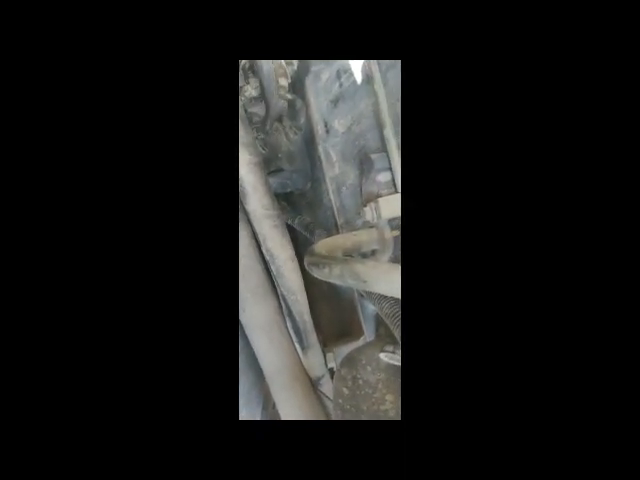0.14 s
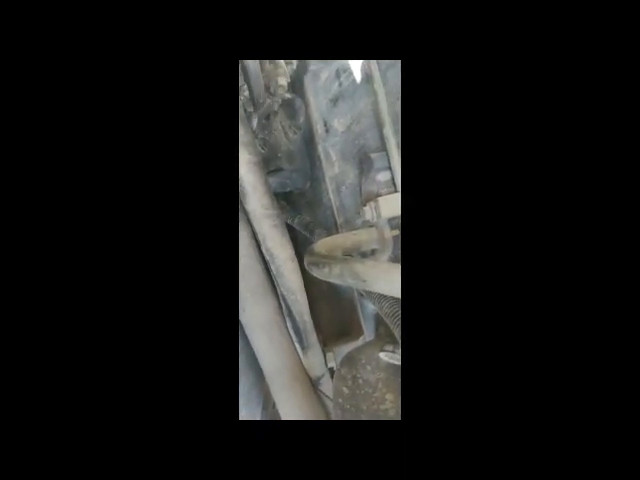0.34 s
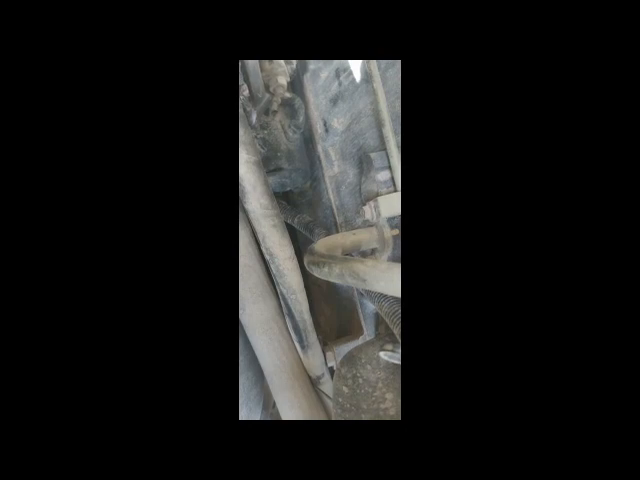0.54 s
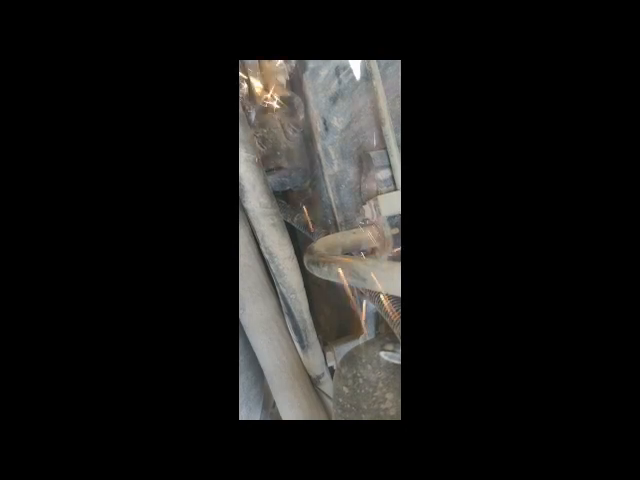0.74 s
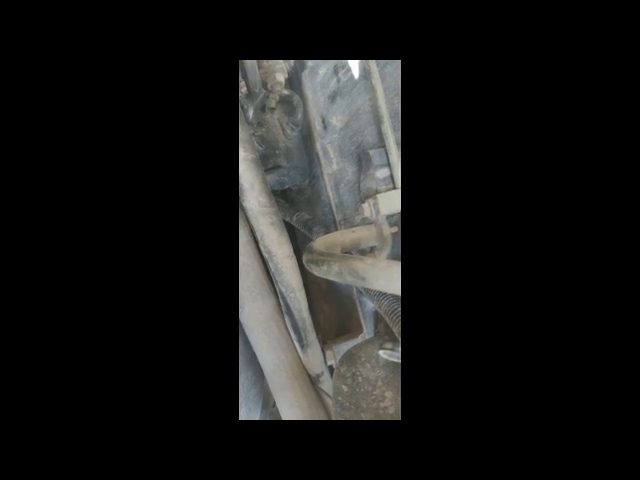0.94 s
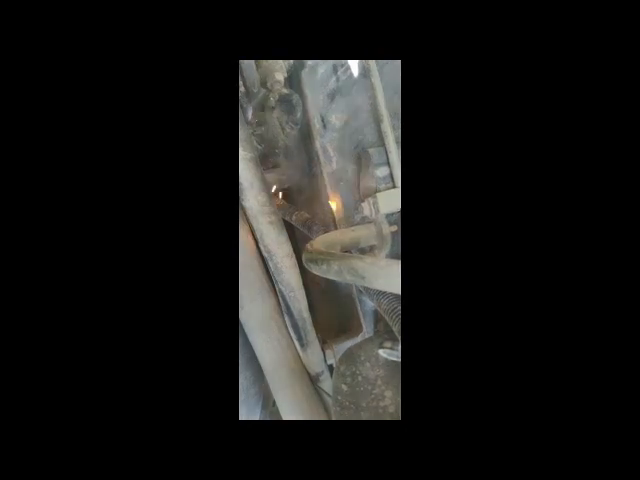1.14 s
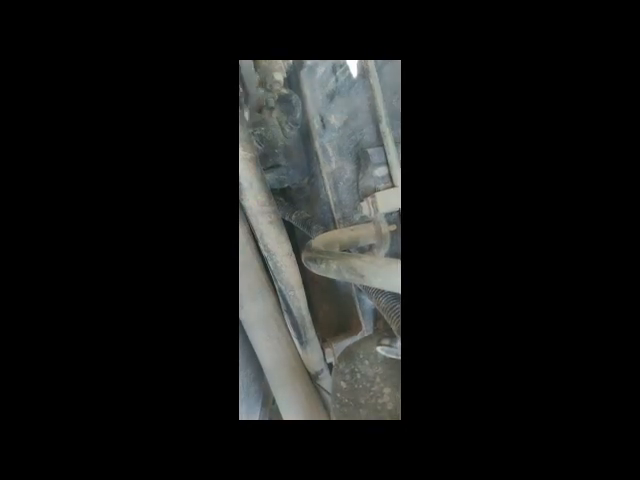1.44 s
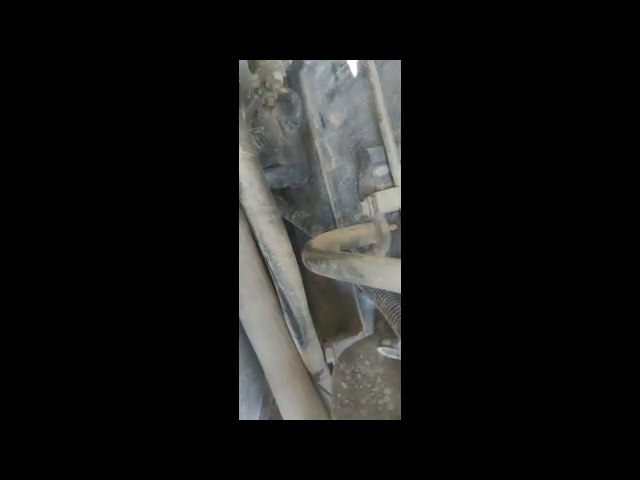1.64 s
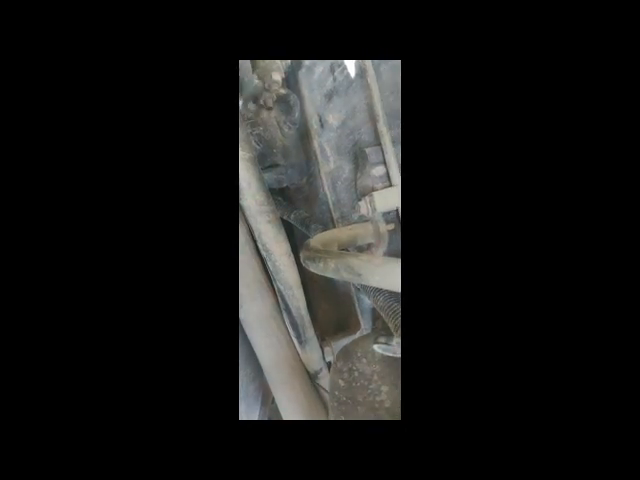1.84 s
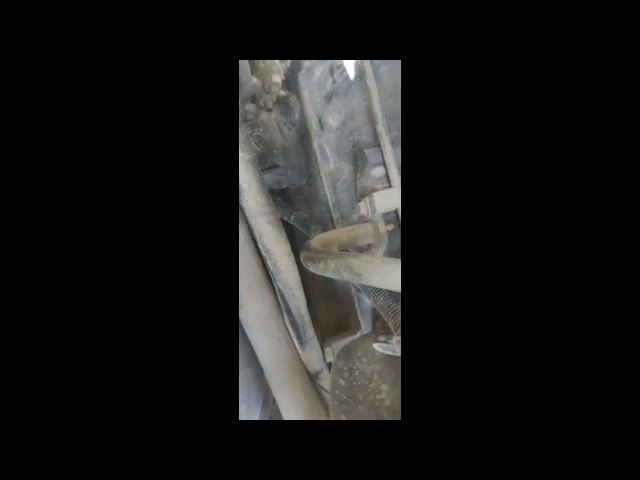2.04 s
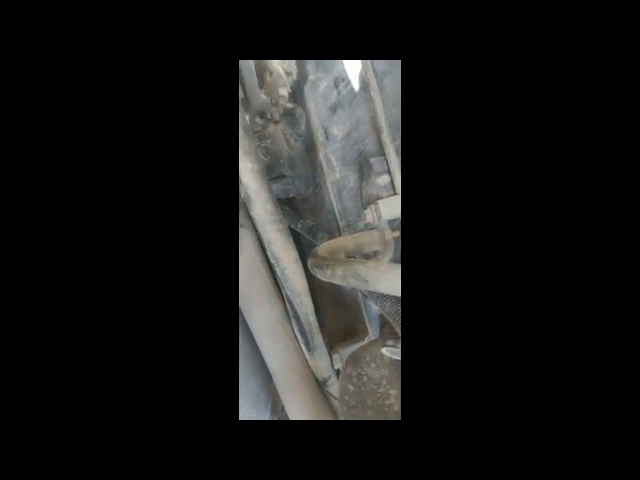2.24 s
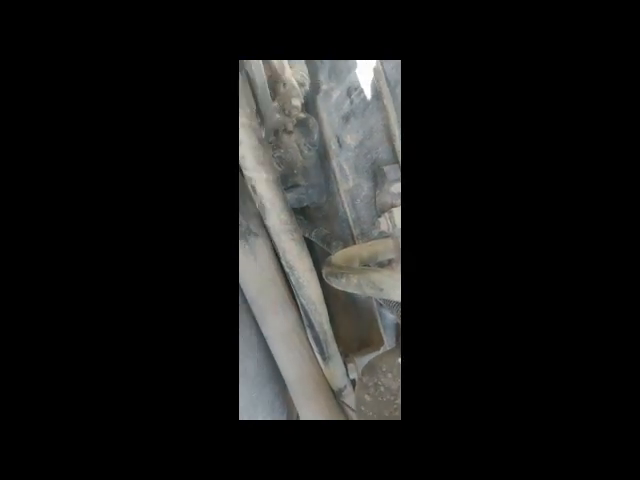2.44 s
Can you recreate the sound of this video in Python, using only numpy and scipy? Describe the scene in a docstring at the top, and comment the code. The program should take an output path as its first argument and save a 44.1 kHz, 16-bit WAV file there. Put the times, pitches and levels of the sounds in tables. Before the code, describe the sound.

Electrical sparks snap close by as a cable clamp touches a motor. The clamp taps metal at 0.2 and 0.5 seconds, ringing briefly. A dull sputter near 0.75 leads to two sharp snaps at 0.85 and 1.1, trailing faint crackle. Three softer taps come between 1.8 and 2 seconds, with light cable rustle and a faint slide near 2.4. Low workshop rumble and machine hum continue throughout.

```python
"""Sparks at a seized starter motor

A battery cable is touched to the motor in a workshop, close to the microphone. The clamp taps twice,
setting metal ringing, and the contact flares with a dull sputter. Two sparks snap and leave a faint
crackle, then three softer taps follow. The cable rustles as it drags and the clamp slides briefly.
A machine hums under the low rumble of the shop."""
import sys
import numpy as np
from scipy import signal
from scipy.fft import rfft, irfft
from scipy.io import wavfile
from scipy.ndimage import uniform_filter1d

SR = 44100
rng = np.random.default_rng(int(sys.argv[2]) if len(sys.argv) > 2 else 0)


def unload_audio(sound):
    """Save the sound as a 16-bit wav file, at the path given as the first command line argument."""
    columns = np.transpose(np.atleast_2d(sound))
    # keep every value between -1 and 1, then stretch to whole-number steps
    steps = np.round(np.clip(columns, -1, 1) * 32767)
    wavfile.write(sys.argv[1], SR, steps.astype(np.int16))


N = 114660
T = np.arange(N) / SR
HIT_T = T[:SR // 2]  # half a second for each short sound
LEFT_LAG_S = .00046  # sound reaches the right side first


def amp(db):
    """Turns decibels into a gain to multiply by."""
    return 10 ** (np.asarray(db) / 20)


def unit(x):
    """Scales a signal to an average power of 1."""
    return x / np.sqrt(np.mean(x ** 2) + 1e-20)


def read(table, hz, column=1):
    """Looks up a table at any frequency, gliding between its rows."""
    table = np.array(table, float)
    return np.interp(np.log(hz + 1), np.log(table[:, 0]), table[:, column])


def level(table, column=1):
    """Turns a table of times and decibels into a gain over the scene."""
    table = np.array(table, float)
    return amp(np.interp(T, table[:, 0], table[:, column]))


def add(mix, s, sound):
    """Mixes a stereo sound in, starting at s seconds."""
    part = mix[:, round(s * SR):][:, :sound.shape[1]]
    part += sound[:, :part.shape[1]]


def colour(x, db_of_hz, size=4096):
    """Turns each frequency up or down, without smearing sound ahead of its start."""
    log_gain = np.log(amp(db_of_hz(abs(np.fft.fftfreq(size, 1 / SR)))) + 1e-6)
    response = np.fft.ifft(np.exp(np.conj(signal.hilbert(log_gain)))).real[..., :size // 2]
    return signal.fftconvolve(x, np.atleast_2d(response), axes=1)[:, :x.shape[1]]


def drift(rate_hz):
    """A smooth random wobble; a higher rate makes it quicker."""
    hz = np.fft.rfftfreq(N, 1 / SR)
    return unit(irfft(rfft(rng.standard_normal(N)) * np.exp(-(hz / rate_hz) ** 2), N))


def burst(t60, rise_s, alike):
    """Dense echoes heard as a burst of noise; t60 is the seconds it takes to fade by 60 dB."""
    shared, *separate = rng.standard_normal((3, len(HIT_T)))
    shared = np.array([np.roll(shared, round(LEFT_LAG_S * SR)), shared])
    x = alike * shared + np.sqrt(1 - alike ** 2) * np.array(separate)
    shape = (1 - np.exp(-(HIT_T / rise_s) ** 2)) * np.exp(-np.log(1000) * HIT_T / t60)
    power = uniform_filter1d(abs(rfft(x * shape)) ** 2, size=200, axis=1)
    x = irfft(rfft(x) / np.sqrt(power + 1e-12), len(HIT_T)) * shape  # even out bass to treble
    return x / np.linalg.norm(x, axis=1, keepdims=True)


def ring(hz, t60, left_db, right_db):
    """One fading note of a struck object."""
    rate = np.log(1000) / t60
    t = np.maximum(HIT_T - np.array([[LEFT_LAG_S], [0]]), 0)
    shape = 2 * rate / SR * (1 - np.exp(-t / .0004)) * np.exp(-rate * t)
    return amp([[left_db], [right_db]]) * shape * np.sin(2 * np.pi * (hz * t + rng.random()))


def grainy(x, db, rate_hz):
    """Breaks a burst into uneven spits and keeps its energy."""
    x = x * amp(db * drift(rate_hz)[:x.shape[1]])
    return x / np.linalg.norm(x, axis=1, keepdims=True)


# how alike the left and right sides sound (frequency [Hz], likeness [0 to 1])
LIKENESS = [(40, 1), (130, 0.98), (290, 0.67), (640, 1), (1400, 0), (15000, 0.076)]

def noise(spectrum):
    """Stereo noise with a given tone, most alike on both sides in the bass."""
    hz = np.fft.rfftfreq(N, 1 / SR)
    left, other = rfft(rng.standard_normal((2, N)))
    same = read(LIKENESS, hz)
    right = same * left + np.sqrt(1 - same ** 2) * other
    return unit(irfft(np.array([left, right]) * amp(read(spectrum, hz)), N))


# loudness of the workshop (time [s], rumble [dB], air [dB])
SHOP_LEVELS = [(0, -32, -75.5), (.2, -39, -59), (.35, -34.5, -66), (.7, -37.5, -65), (.9, -38, -59),
               (1.15, -40.5, -66), (1.6, -40.5, -79), (2.2, -41.5, -73), (2.6, -41, -88.5)]
# tone of its rumble and of its air (frequency [Hz], level [dB])
RUMBLE_TONE = [(15, -50.5), (29, -31.5), (42, -4.5), (71, -10), (176, -7), (253, -12.5), (285, -10.5),
               (387, -14), (430, -21.5), (540, -26), (644, -26), (1120, -38.5), (5200, -87.5)]
AIR_TONE = [(200, -7.5), (800, 1.5), (1500, -3), (2800, -10), (4200, -18), (6800, -14.5), (8500, -34.5),
            (15000, -38)]

def shop():
    """The workshop's low rumble and faint airy hiss."""
    rumble = level(SHOP_LEVELS) * noise(RUMBLE_TONE) * amp([[-1.5], [-.3]])
    return rumble + level(SHOP_LEVELS, column=2) * noise(AIR_TONE)


# notes of the machine (pitch [Hz], left [dB], right [dB])
HUM_NOTES = [(165.2, -60, -55), (280.9, -42.5, -45.5), (421.8, -51.5, -63)]
# how the hum swells and sinks (time [s], relative level [dB])
HUM_LEVELS = [(0, -1.5), (.38, 3.5), (.7, 2), (1.18, -9.5), (1.33, 3.5), (1.47, -7), (1.6, 1.5),
              (1.75, -7.5), (2, -0.5), (2.28, -1), (2.6, -4.5)]

def hum(wander_hz=5, waver=0.3):
    """A machine hums, each note wavering in pitch and loudness."""
    out = 0
    for hz, left_db, right_db in HUM_NOTES:
        tone = np.sin(2 * np.pi * np.cumsum(hz + wander_hz * drift(12)) / SR)
        tone *= 1 + waver * drift(2.7)
        out += amp([[left_db], [right_db]]) * unit(tone * level(HUM_LEVELS))
    return out


# swells of a low drone (pitch [Hz], peak time [s], half width [s], level [dB])
DRONE_SWELLS = [(130.7, 0.29, 0.15, -38), (168, 0.381, 0.025, -35)]

def drone():
    """Two low notes swell briefly and sink away."""
    out = 0
    for hz, s, width, db in DRONE_SWELLS:
        swell = amp(db) * np.exp(-((T - s) / width) ** 2)
        out += swell * np.sqrt(2) * np.sin(2 * np.pi * (hz * T + rng.random()))
    return out


# moves of the cable (peak time [s], rise [s], fall [s], scrape [dB], hiss [dB])
CABLE_STROKES = [(0.017, 0.0099, 0.042, -65, -61), (1.24, 0.049, 0.037, -57.5, -70),
                 (1.591, 0.084, 0.1, -99, -73.5), (1.682, 0.031, 0.025, -59.5, -72),
                 (1.813, 0.054, 0.052, -47, -69), (2.351, 0.023, 0.022, -72, -63),
                 (2.41, 0.026, 0.017, -70, -68.5), (2.48, 0.058, 0.044, -89, -76.5),
                 (2.595, 0.045, .04, -57.5, -87)]
# tone of its scrape and of its hiss (frequency [Hz], level [dB])
SCRAPE_TONE = [(300, -13.5), (800, 4), (1700, -0.5), (2800, -8), (4500, -20.5), (8000, -36.5), (15000, -46)]
HISS_TONE = [(2000, -19.5), (4000, -12), (5900, -9), (7200, -1.5), (8100, -29), (10500, -25.5),
             (15000, -29)]

def rustle():
    """The cable drags in short, grainy strokes."""
    scrape = hiss = 0
    for s, rise, fall, scrape_db, hiss_db in CABLE_STROKES:
        stroke = np.exp(-((T - s) / np.where(T < s, rise, fall)) ** 2)
        scrape += amp(scrape_db) * stroke
        hiss += amp(hiss_db) * stroke
    grain = unit(amp(2 * drift(180)))
    return grain * (scrape * noise(SCRAPE_TONE) + hiss * noise(HISS_TONE) * amp([[2.5], [-3]]))


# knocks of the clamp (time [s], level [dB], treble limit [Hz], chink [dB], chink limit [Hz], jaw [dB])
CLAMP_TAPS = [(.2112, -1.5, 5440, -14.5, 10900, -2), (.4912, 0.5, 5600, -4, 14200, -0.5),
              (1.8203, -7, 3840, -16, 11200, -8.5), (1.9207, -6.5, 2090, -18, 15800, -28),
              (2.0128, -4.5, 1364, -45, 10900, -32.5)]
# notes of the struck metal (pitch [Hz], fade time [s], left [dB], right [dB])
BODY_NOTES = [(645, 0.036, -5.5, 19), (924, 0.031, -2, 14), (1440, 0.092, 19.5, 22), (2000, 0.092, -1, 18),
              (2420, 0.021, 12.5, 15), (2608, 0.11, 18.5, 12), (2898, 0.27, 6, 3.5), (2990, 0.16, 17.5, 6),
              (4670, 0.063, 4, -3), (5350, 0.038, -10, 19.5)]
# thin, bright chink on top (pitch [Hz], left [dB], right [dB])
CHINK_PEAKS = [(6870, 12.5, -5), (10450, -25.5, 6.5), (13330, -18, -4), (14540, -15.5, -4)]
# tone of a tap's rattle and of its echo in the room (frequency [Hz], level [dB])
RATTLE_TONE = [(80, -5), (330, 7.5), (520, -5), (750, 14.5), (1180, 0), (1500, 10), (3400, 3.5),
               (5200, 6.5), (6000, -3.5), (7200, 20.5), (8300, -40.5)]
ECHO_TONE = [(100, -9.5), (700, 9.5), (1500, 0), (3000, -7), (3800, -16.5), (7000, -20), (8300, -36)]

def tap(db, treble_hz, chink_db, chink_limit_hz, jaw_db):
    """The clamp knocks on metal and its jaw rings; a softer contact gives less treble."""
    def blow_db(hz):
        return db - 10 * np.log10(1 + (hz / treble_hz) ** 11)

    def chink_tone(hz, width_hz=266):
        peaks = sum(amp([[left_db], [right_db]]) / (1 + ((hz - centre) / width_hz) ** 2)
                    for centre, left_db, right_db in CHINK_PEAKS)
        return chink_db + 20 * np.log10(peaks / (1 + (hz / chink_limit_hz) ** 20))

    body = sum(amp(blow_db(hz)) * ring(hz, *note) for hz, *note in BODY_NOTES)
    jaw = amp(jaw_db) * ring(hz=3920, t60=0.033, left_db=14, right_db=17.5)
    rattle = colour(burst(0.076, 0.0004, alike=0.42), lambda hz: read(RATTLE_TONE, hz) + blow_db(hz))
    chink = colour(burst(0.042, 0.00025, alike=0.23), chink_tone)
    echo = colour(burst(0.29, 0.018, alike=0), lambda hz: read(ECHO_TONE, hz) + blow_db(hz))
    return body + jaw + rattle + chink + amp(-13) * echo


# tone shared by crackles and sparks (frequency [Hz], left [dB], right [dB])
CRACK_TONE = [(40, 5, -1.5), (600, 14.5, 19), (970, 19, 19), (1510, 11.5, 11), (3100, 16, 15.5),
              (3450, 9.5, 9), (4200, 20, 15.5), (6100, 22, 7.5), (7610, 21.5, 7), (8190, 11, 0.5),
              (9040, 1.5, -9.5), (9810, 8, 21), (12860, 1, 19.5), (13400, 4.5, 11), (15000, 1.5, 8.5)]

def crack_db(hz):
    """How strong a crack is at each frequency, left and right."""
    return np.array([read(CRACK_TONE, hz, column=1), read(CRACK_TONE, hz, column=2)])


# small crackles (time [s], level [dB], treble tilt [dB per octave])
METAL_SPITS = [(.261, -41.5, -10), (.733, -44, -11), (.9645, -56, 2), (1.012, -35, -7),
               (1.1262, -15.5, -1.5), (1.1345, -27.5, 2), (1.2335, -58, -2), (1.3025, -49.5, -10),
               (1.374, -67, -2), (2.39, -57, -8.5)]

def crackle(db, tilt_db):
    """A small spit of hot metal."""
    spit = burst(t60=.045, rise_s=.0006, alike=0.36)
    return amp(db) * colour(spit, lambda hz: crack_db(hz) + tilt_db * np.log2(np.maximum(hz, 900) / 4500))


# loudness of the flare (time [s], level [dB])
FLARE_LEVELS = [(.715, -52), (.735, -31), (.762, -23.5), (.785, -34), (.822, -28.5), (.84, -57.5)]
# tone of its dull rush (frequency [Hz], level [dB])
RUSH_TONE = [(60, -11.5), (200, 5.5), (520, 1), (800, -6.5), (1300, -15), (3000, -27.5), (4000, -44),
             (7000, -45.5), (8500, -64)]
# notes of the hollow round the contact (pitch [Hz], fade time [s], left [dB], right [dB])
HOLLOW_NOTES = [(190, .055, 46, 41.5), (462, .045, 52, 48.5), (770, .03, 29, 30.5)]

def flare():
    """The contact burns in uneven puffs that ring the hollow round it, over a dull rush."""
    loudness = level(FLARE_LEVELS)
    puffs_per_s = 90 * np.exp(.25 * drift(70))
    puffs = np.diff(np.floor(np.cumsum(puffs_per_s) / SR), prepend=0)  # one click for each puff
    hollow = sum(ring(*note) for note in HOLLOW_NOTES)
    sputter = signal.fftconvolve((puffs * loudness)[None], hollow, axes=1)[:, :N]
    return sputter + amp(-7) * loudness * noise(RUSH_TONE)


# the two sparks (time [s], level [dB], thump [dB], crack fade time [s], echo [dB], fizz [dB])
SPARK_SNAPS = [(.8366, -0.5, 27.5, .028, -13.5, -51), (1.1051, -1.5, 19, .042, -10.5, -32.5)]
# metal that each spark sets ringing (pitch [Hz], left [dB], right [dB])
METAL_NOTES = [(1040, 19.5, 16), (1800, 20, 14), (2830, 26, 12), (3005, 20.5, 18.5), (3704, 15, 20),
               (4430, 24, 20.5), (4735, 17.5, 23.5), (5000, 19.5, 21), (5490, 20.5, 19), (6005, 28.5, 19),
               (6351, 23.5, 14.5), (6690, 25.5, 13.5), (7140, 33.5, 9), (7380, 24, 8.5), (10230, 8, 23),
               (10978, 2.5, 23.5), (10300, 7, 24.5), (12207, 5, 24.5)]

def spark(db, thump_db, t60, echo_db, fizz_db, thump_s=0.0016, damping_hz=10000):
    """An arc bursts: a pressure thump, a ragged crack, ringing metal and a sputtering tail."""
    crack = colour(grainy(burst(t60, 0.0018, alike=0.35), db=3.5, rate_hz=900), crack_db)
    echo = amp(echo_db) * grainy(burst(0.077, 0.024, alike=0), db=0.5, rate_hz=300)
    fizz = amp(fizz_db) * grainy(burst(0.62, 0.022, alike=0), db=4.5, rate_hz=60)
    tail = colour(echo + fizz, lambda hz: crack_db(hz) - 10 * np.log10(1 + (hz / damping_hz) ** 6))
    metal = sum(ring(hz, 0.085 * np.sqrt(3000 / max(hz, 2800)), *levels)  # high notes die first
                for hz, *levels in METAL_NOTES)
    age = HIT_T / thump_s
    pulse = (1 - age) * np.exp(-age) * (1 - np.exp(-HIT_T / 0.00026))  # air pushes, then pulls back
    thump = amp(thump_db) * 2 / (thump_s * SR) * pulse * amp([[-3], [0]])
    return amp(db) * (crack + tail + amp(1) * metal + thump)


# metal sliding on metal (peak time [s], half width [s], pitch [Hz], level [dB])
CLAMP_SLIDES = [(2.351, .022, 4870, -69.5), (2.409, 0.017, 4900, -68)]

def scuff(band_hz=240):
    """The clamp slides briefly, and the rubbing stirs one narrow band of pitches."""
    hz = np.fft.rfftfreq(N, 1 / SR)
    out = 0
    for s, width, centre_hz, db in CLAMP_SLIDES:
        band = irfft(rfft(rng.standard_normal((2, N))) / (1 + ((hz - centre_hz) / band_hz) ** 2), N)
        out += amp(db) * np.exp(-((T - s) / width) ** 2) * unit(band)
    return out


def scene():
    """Lays the sounds of the cable and clamp over the workshop."""
    mix = shop() + hum() + drone() + flare() + rustle() + scuff()
    for table, source in ((SPARK_SNAPS, spark), (METAL_SPITS, crackle), (CLAMP_TAPS, tap)):
        for s, *row in table:
            add(mix, s, source(*row))
    return mix


def record(dry):
    """The highest peaks overload and flatten; then the very top of the treble is cut."""
    low_pass = signal.firwin(255, cutoff=15250, window=("kaiser", 9), fs=SR)
    return signal.oaconvolve(np.clip(dry, -.88, .88), low_pass[None], "same")


dry = scene()
out = record(dry)
unload_audio(out)
```